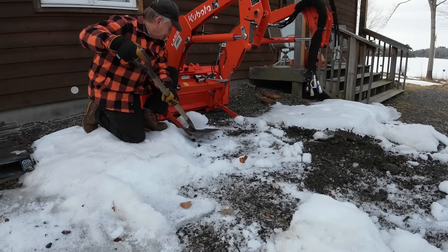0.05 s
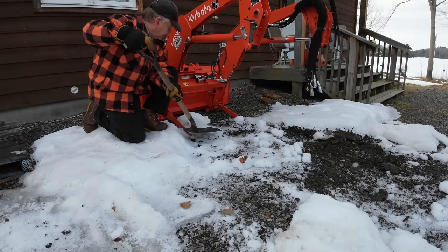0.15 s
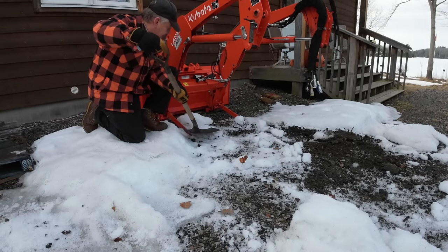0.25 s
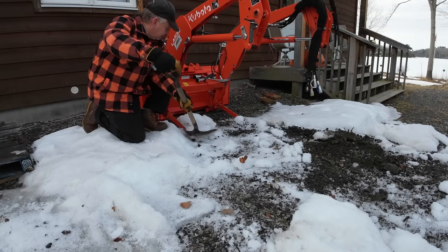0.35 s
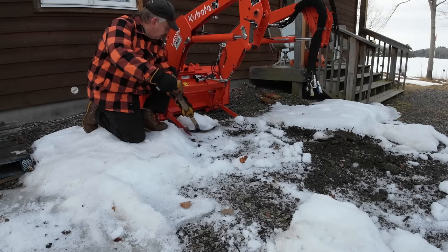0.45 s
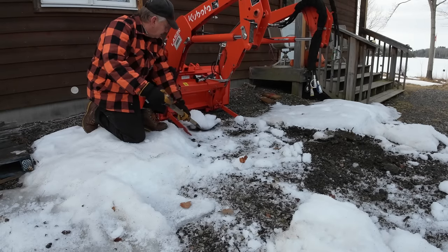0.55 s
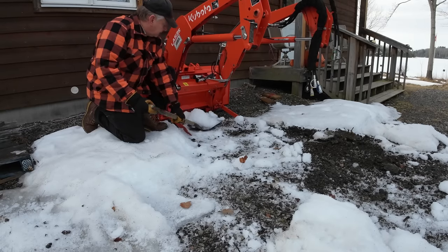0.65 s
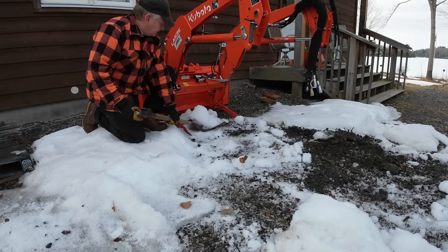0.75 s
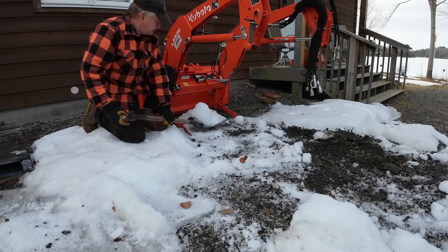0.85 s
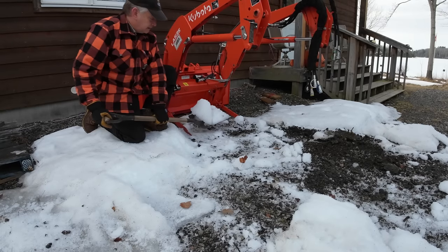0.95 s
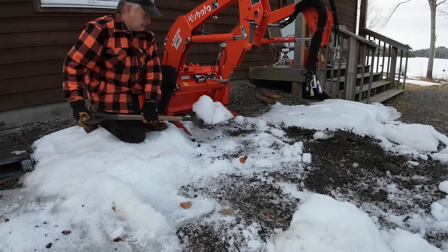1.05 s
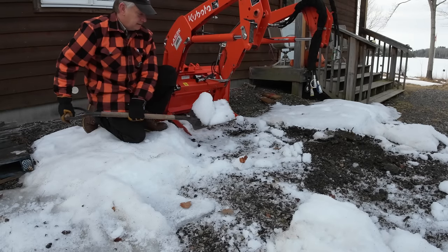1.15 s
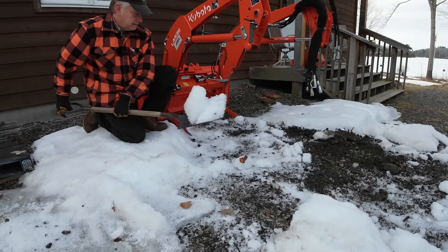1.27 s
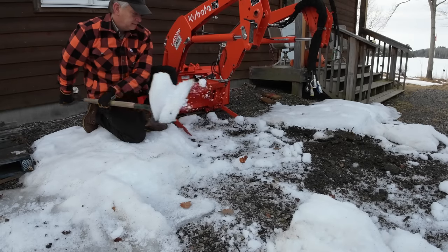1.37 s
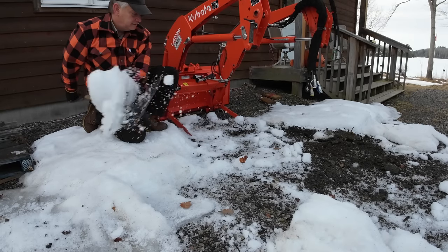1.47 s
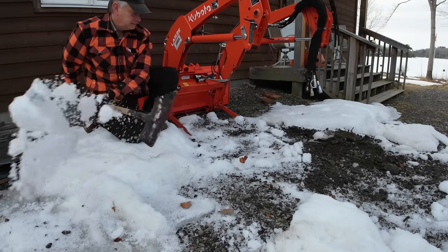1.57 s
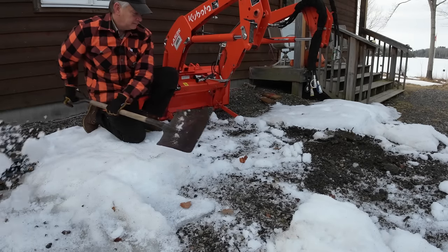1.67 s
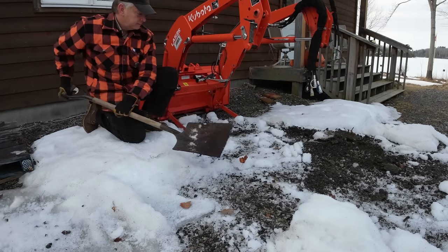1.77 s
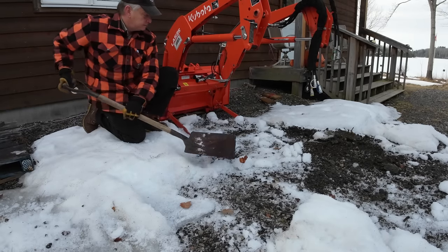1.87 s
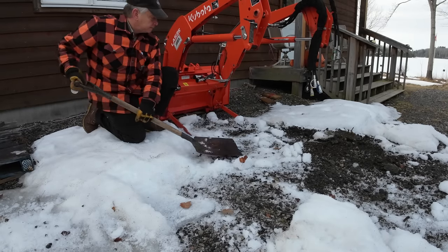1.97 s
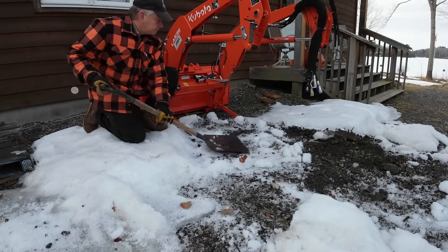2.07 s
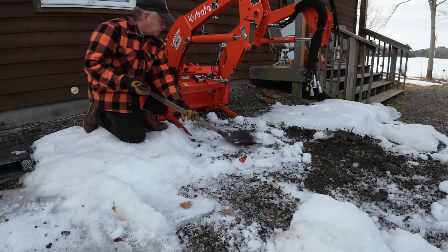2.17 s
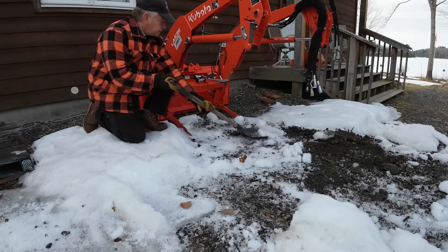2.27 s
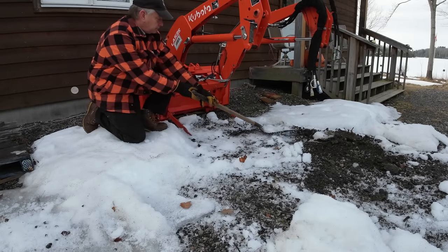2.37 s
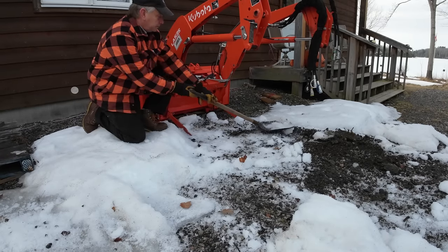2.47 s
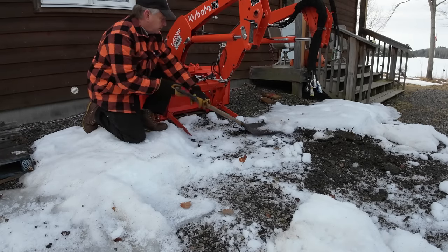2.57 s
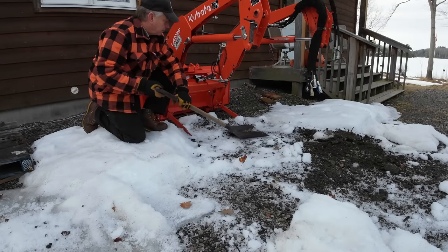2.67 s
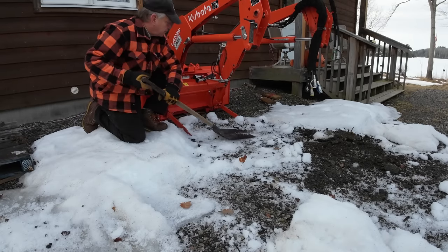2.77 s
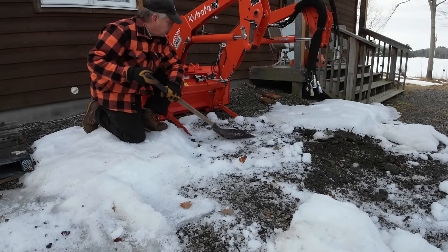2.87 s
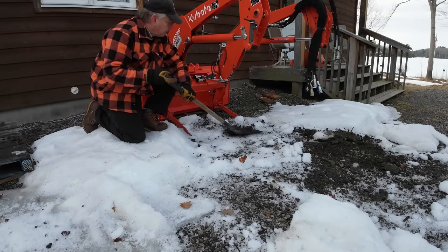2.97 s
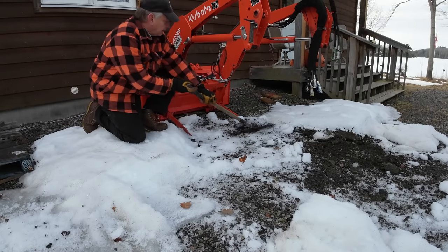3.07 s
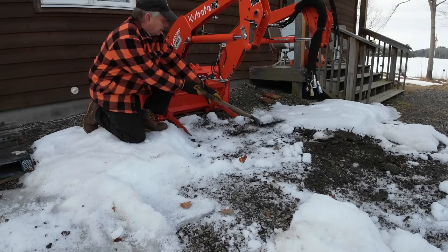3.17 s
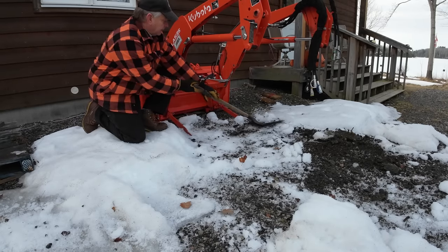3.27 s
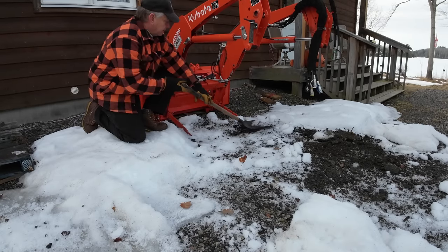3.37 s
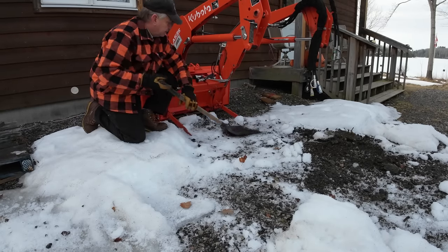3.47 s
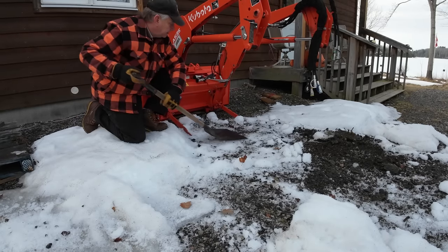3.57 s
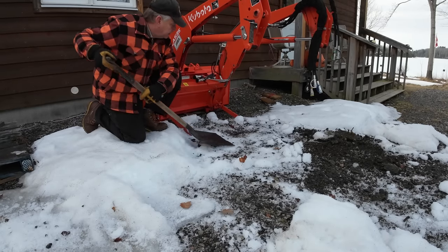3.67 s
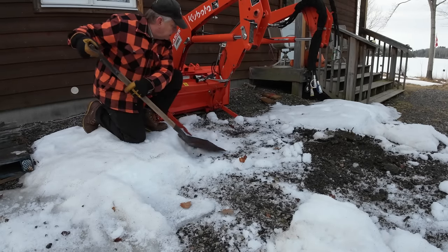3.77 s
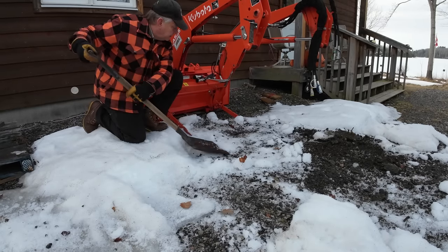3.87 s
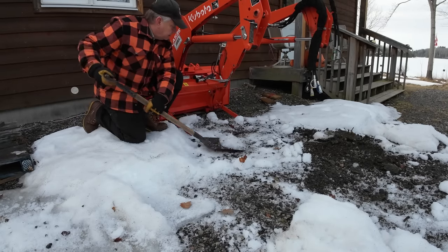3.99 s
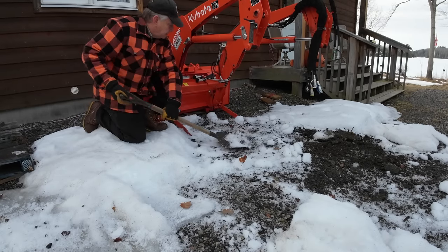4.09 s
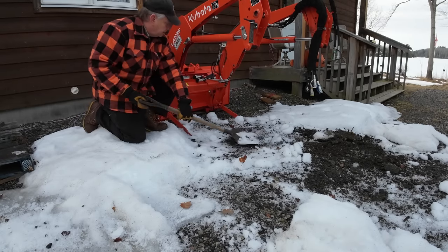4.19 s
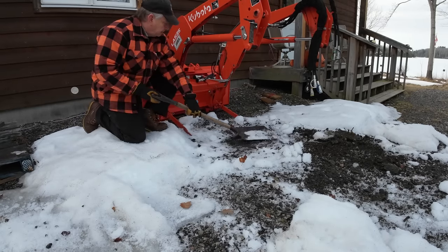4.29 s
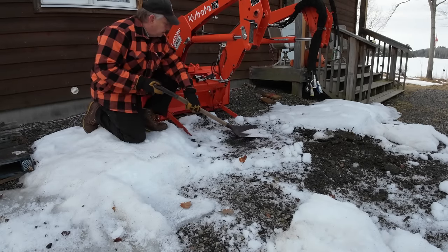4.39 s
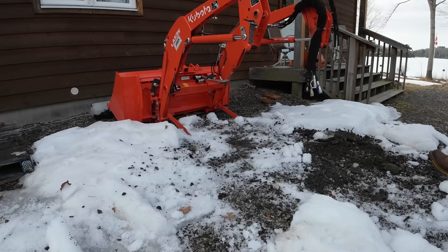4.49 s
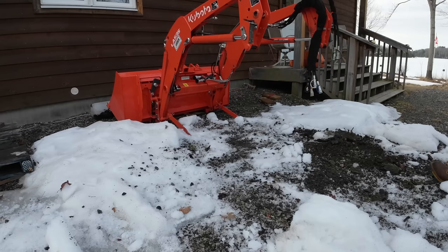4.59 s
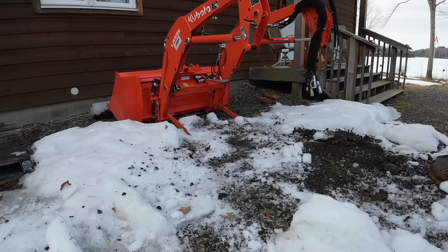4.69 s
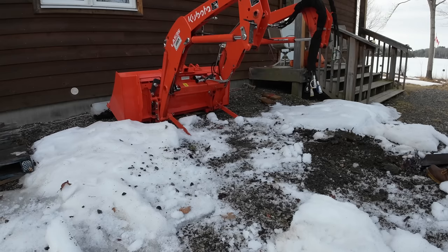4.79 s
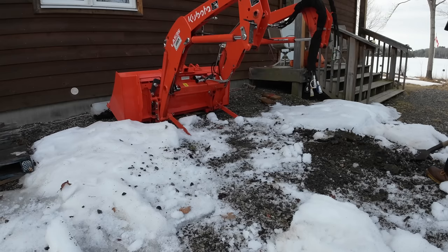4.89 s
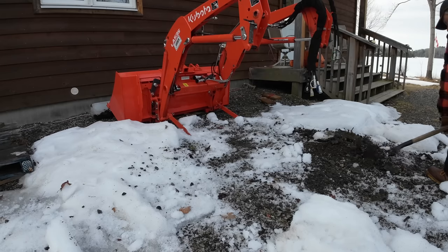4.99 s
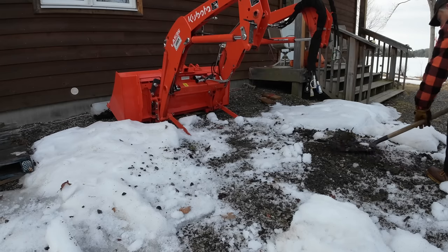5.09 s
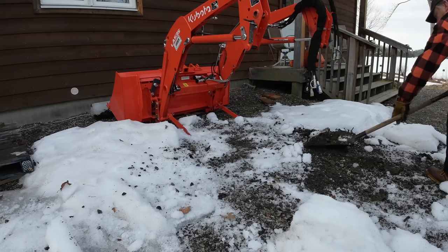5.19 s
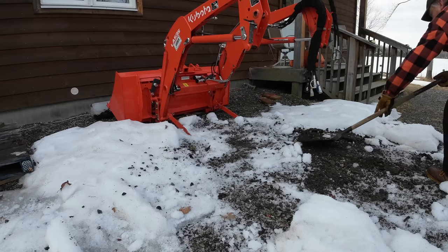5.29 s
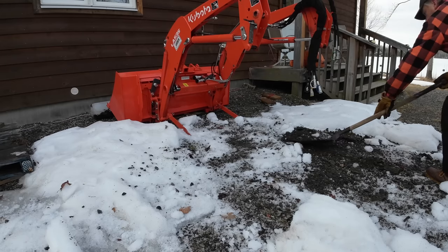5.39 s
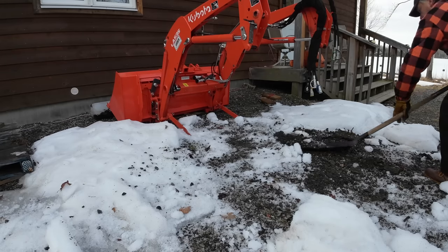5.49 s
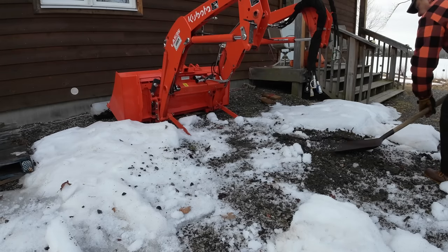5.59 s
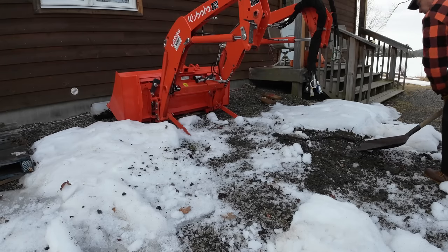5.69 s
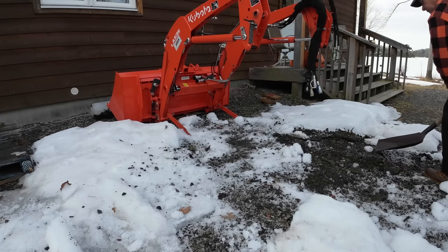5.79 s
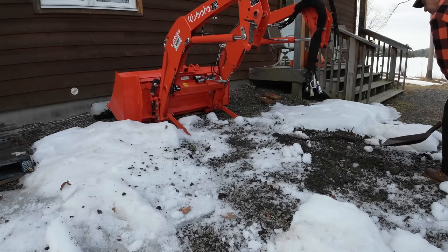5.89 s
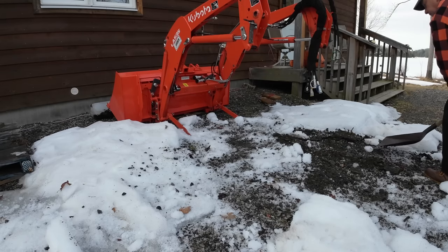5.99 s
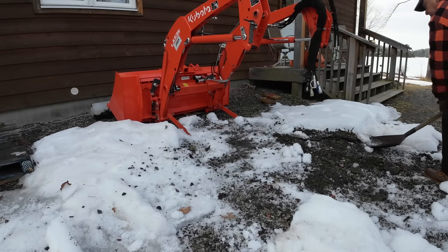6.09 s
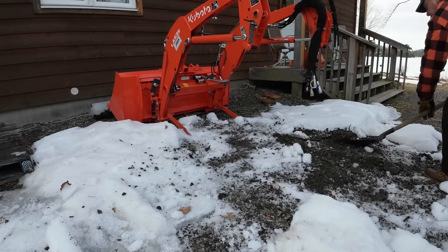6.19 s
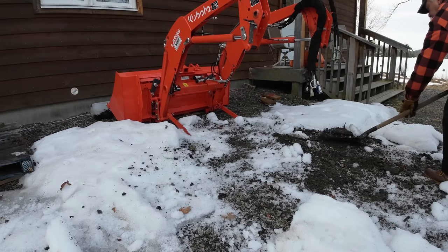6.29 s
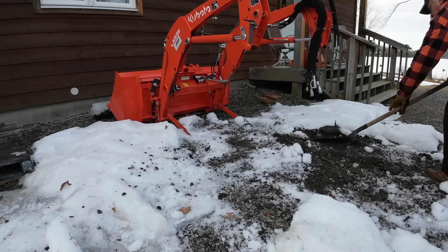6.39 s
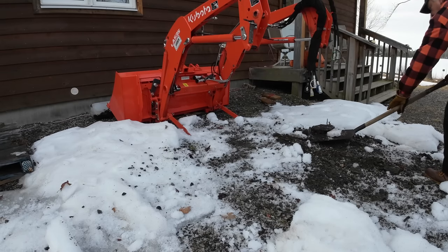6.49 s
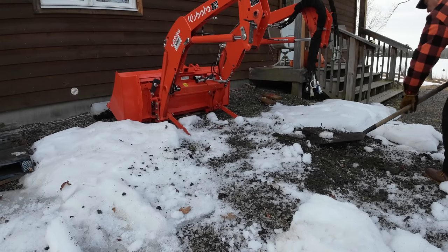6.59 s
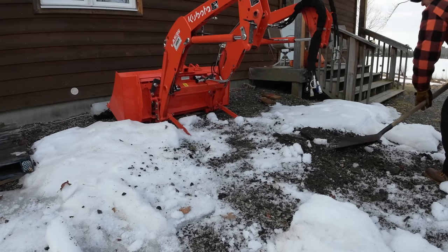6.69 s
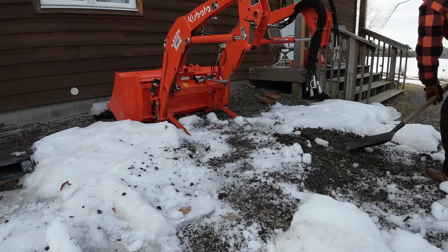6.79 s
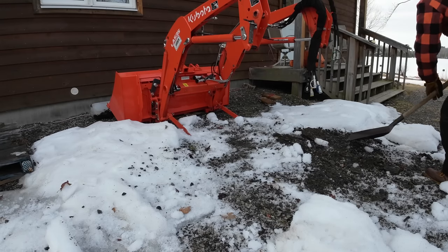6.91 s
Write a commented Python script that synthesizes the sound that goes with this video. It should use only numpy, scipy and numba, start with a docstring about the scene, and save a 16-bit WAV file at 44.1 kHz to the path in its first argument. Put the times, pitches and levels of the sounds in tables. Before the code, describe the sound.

Close outdoor shovelling on frozen gravel: a gritty scrape, a pause, then a dull snow thump with fine grains showering down. A run of uneven, grating strokes follows, the blade clanking and ringing briefly when lifted, ice chips cracking. It pauses, then sharp, bright scrapes return, separated by short quiet gaps. The small microphone gives little bass; a wooden wall adds faint short echoes over a quiet yard hum.

```python
"""Shovel on an icy gravel yard

A steel shovel scrapes icy snow off gravel beside a wooden wall. Dense grit clicks crunch at the edge and
shake the modes of the blade, which the ground damps and which ring on when it is lifted. Stones jolt the
edge, chips snap, thrown snow showers down as fine grains, and lumps land as short low thuds.
The wall returns three dull echoes, and the yard hums faintly as coloured noise."""
import sys
import numpy as np
from scipy import signal
from scipy.fft import rfft, irfft, next_fast_len
from scipy.io import wavfile
from numba import njit

SR = 44100
rng = np.random.default_rng(int(sys.argv[2]) if len(sys.argv) > 2 else 0)


def master(y):
    """Save y as 16-bit WAV."""
    cut = np.clip(np.atleast_2d(y).T, -1, 1)
    pcm = np.round(cut * 32767)  # scale
    wavfile.write(sys.argv[1], SR, pcm.astype(np.int16))


N = 306432   # samples
STEP = 32   # samples between points of the slow curves


def from_db(db):
    """Decibels to an amplitude factor."""
    return np.exp(np.asarray(db) * np.log(10) / 20)


def rms_one(x):
    """Scales a signal to rms 1."""
    return x / np.sqrt(np.mean(x ** 2) + 1e-20)


def every_sample(coarse):
    """Draws straight lines between the points of a slow curve."""
    return np.interp(np.arange(N) / STEP, np.arange(len(coarse)), coarse)


def drift(rate_hz):
    """Slow random wander with spread 1: noise through two equal low-pass poles."""
    pole = np.exp(-2 * np.pi * rate_hz * STEP / SR)
    noise = rng.standard_normal(N // STEP + 1002)
    slow = signal.lfilter([1], [1, -2 * pole, pole * pole], noise)[1000:]   # skip the filter's start
    return every_sample(rms_one(slow))


def coloured(x, spectrum):
    """Shapes a flat signal to a spectrum; rms 1."""
    size = next_fast_len(N)
    hz, db = np.transpose(spectrum)
    bins_hz = np.arange(size // 2 + 1) * SR / size
    gain = from_db(np.interp(np.log(bins_hz + 1), np.log(hz), db))
    return rms_one(irfft(rfft(x, size) * gain, size)[:N])


def brightened(x, bright_db, corner_hz):
    """Scales what lies above a corner."""
    low = signal.lfilter(*signal.butter(1, corner_hz, fs=SR), x)
    return low + from_db(bright_db) * (x - low)


def grit(per_s, spread_db, clump_db):
    """Random clicks of uneven size, coming in clumps; rms 1."""
    sizes = from_db(spread_db * np.minimum(rng.exponential(1, N), 5)) * rng.choice([-1, 1], N)
    born = rng.random(N) < per_s / SR
    return rms_one(sizes * born * from_db(clump_db * drift(53)))


def shortfall(rows):
    """How many dB each row lies under its full level through rise, hold and fall, as slow curves."""
    t = np.arange(0, N + STEP, STEP) / SR
    full, rise, hold, fall = np.transpose(rows)[:4, :, None]
    early = np.maximum(full - t, 0)
    late = np.maximum(t - full - hold, 0)
    return 20 * (early / np.maximum(rise, .002) + late / np.maximum(fall, .002))


def add_at(out, start_s, sound):
    """Mixes a short sound into a track, cut at the end of the track."""
    at = round(start_s * SR)
    out[at:at + len(sound)] += sound[:N - at]


# Hum of the yard. Each row: frequency in Hz, relative density in dB per Hz.
YARD = [(12, -37), (20, -8.5), (27, -18.5), (166, -5.5), (202, -18), (259, -15.5), (289, -16), (614, -20),
        (4000, -31.5), (15500, -45.5)]
YARD_DB = -61.5   # mean level, dB


def yard_hum():
    """Steady noise coloured like the open yard, its level wandering slowly by about 1 dB."""
    return from_db(YARD_DB + 1.0 * drift(3)) * coloured(rng.standard_normal(N), YARD)


# Reflections off the wooden wall. Each row: delay in seconds, level in dB.
WALL_ECHOES = [(.007, -24.5), (.013, -25.5), (0.023, -29.5)]


def wall_echoes(dry):
    """Late, quiet copies of the work, dulled because rough boards scatter the treble."""
    dull = signal.lfilter([.4], [1, -.6], dry)
    return sum(from_db(db) * np.pad(dull, (round(lag * SR), 0))[:N] for lag, db in WALL_ECHOES)


# Waves of thrown snow coming down. Each row: full from in seconds, rise in seconds per 20 dB,
# hold in seconds, fall in seconds per 20 dB, full level in dB.
SHOWER = [(1.721, 0.03, 0.073, 0.07, -42), (1.799, 0.01, 0.032, 0.04, -32), (1.869, 0.03, .02, 0.23, -40.5)]
# Colour of the falling grains. Each row: frequency in Hz, relative density in dB per Hz.
SHOWER_COLOUR = [(88, -43), (150, -13.5), (197, -3), (414, -3.5), (1530, -12), (7770, -4), (14200, -13.5),
                 (16000, -22)]


def shower():
    """Fine grains of snow patter on the crust: dense coloured clicks that swell in waves."""
    level = from_db(np.transpose(SHOWER)[4, :, None] - shortfall(SHOWER)).sum(0)
    patter = coloured(grit(9000, spread_db=2.5, clump_db=2.5), SHOWER_COLOUR)
    return every_sample(level) * patter


# Lumps of snow landing. Each row: start in seconds, relative strength in dB, pitch in Hz.
THUDS = [(0.673, -33, 420), (1.202, -23.5, 410), (1.815, -8, 418), (1.828, -16, 330), (2.356, -13.5, 319),
         (2.415, -18, 302), (3.774, -15, 581), (4.197, -20, 630), (4.591, -27, 213), (5.22, -29, 249),
         (5.262, -30, 300), (5.667, -22, 352), (5.698, -22, 353), (5.82, -25, 368), (6.14, -18, 555),
         (6.496, -26, 543)]


def thuds():
    """A soft lump: a brief low tone with a puff of noise, both kept dull by a low-pass."""
    out, t = np.zeros(N), np.arange(SR // 8) / SR
    shape = (1 - np.exp(-t / 0.0065)) * np.exp(-t / 0.0049)
    for start_s, strength_db, hz in THUDS:
        puff = rng.standard_normal(len(t)) * 0.46
        tone = np.sin(2 * np.pi * hz * t)
        add_at(out, start_s, from_db(strength_db) * shape * (puff + tone))
    return signal.sosfilt(signal.butter(2, 900, fs=SR, output="sos"), out)


# Single pebbles and ice chips snapping. Each row: start in seconds, relative strength in dB.
SNAPS = [(0.396, -12), (0.4414, -24), (0.455, -17), (0.828, -34), (1.2015, -31), (1.2714, -43),
         (1.313, -36), (1.3458, -38.5), (1.3736, -29), (1.3844, -25), (1.4032, -36), (1.571, -39),
         (1.7978, -14), (1.9245, -25.5), (2.4096, -14), (2.936, -10), (2.9646, -8), (3.331, -14),
         (3.418, -9), (3.935, -1), (4.089, -4), (4.3043, -33), (5.2455, -22), (5.474, -9.5), (5.526, -13),
         (5.8235, -39), (5.9285, -40), (5.9589, -41.5), (5.9994, -47), (6.0437, -25)]


def snaps():
    """Cracks a few ms long: mostly one-sided noise dying fast, through a band-pass."""
    out, t = np.zeros(N), np.arange(SR // 50) / SR
    for start_s, strength_db in SNAPS:
        crack = np.exp(-t / 0.0021) * rng.uniform(-0.1, 1, len(t))
        add_at(out, start_s, from_db(strength_db) * crack)
    return signal.sosfilt(signal.butter(1, [900, 6000], "band", fs=SR, output="sos"), out)


# Colour of the ground's rumble. Each row: frequency in Hz, relative density in dB per Hz.
RUMBLE = [(20, -31), (60, -17), (120, -11.5), (300, -2.5), (450, -5), (700, -5), (1400, -35)]


def ground_rumble(level_db):
    """The low part of the scrape: clumped clicks coloured low, following the strokes."""
    return from_db(level_db) * coloured(grit(4000, spread_db=2.0, clump_db=2.0), RUMBLE)


# The blade's modes. Each row: frequency in Hz, relative level in dB, T60 in seconds when held free.
BLADE = [(307, -6, .45), (624, 4, .35), (655, -1, .3), (727, -8, .6), (899, -9, .7), (1015, -3, .9),
         (1072, -2, .4), (1145, -5, .3), (1203, -2, 1.2), (1265, -5, .3), (1305, -7, .6), (1419, -12, 1.2),
         (1507, -2, .45), (1650, -7, .3), (1733, -6, .4), (1949, -8, .5), (2062, -3, .3), (2258, -9, .3),
         (2422, -11, .3), (2590, -9, .35), (2680, -10, .3), (2760, -11, .3), (2929, -13, .2),
         (3095, -12, .25), (3386, -13, .25), (3601, -12, .15), (3779, -14, .2), (3962, -15, .15),
         (4300, -14, .15)]
# Single knocks on the steel. Each row: start in seconds, relative strength in dB,
# frequency in Hz of the mode that the place of the blow favours.
CLANKS = [(1.982, -35, 624), (1.99, -26, 1507), (1.995, -29, 3601), (2.05, -22, 624), (2.395, -24, 624),
          (2.529, -36.5, 1072), (2.64, -34, 624), (2.746, -17, 1507), (2.795, -20, 624), (3.2, -41, 624),
          (3.235, -33, 1265), (3.345, -28, 1072), (3.426, -20.5, 1072), (3.44, -20, 2062), (3.5, -32, 624),
          (3.519, -18, 1507), (3.632, -13.5, 1265), (3.689, -19.5, 624), (3.78, -23.5, 624),
          (4.2, -21, 624), (5.476, -26.5, 1203), (5.53, -37, 1203), (5.555, -26, 1015), (5.57, -32, 1507),
          (5.578, -31, 2062), (6.501, -21, 1507), (6.577, -33, 1733), (6.601, -41, 1203),
          (6.651, -29, 2062), (6.655, -35.5, 1507)]
PRESSED_T60_S = 0.023   # ring time with the edge dug in


@njit
def ring(push, turn, keep):
    """One mode, a decaying rotation pushed along, whose loss per sample changes in time."""
    out, re, im, c, s = np.zeros(len(push)), 0., 0., np.cos(turn), np.sin(turn)
    for i in range(len(push)):
        re, im = keep[i] * (re * c - im * s) + push[i], keep[i] * (re * s + im * c)
        out[i] = im
    return out


def blade(push, free):
    """Pressure on the ground shortens every mode; each mode is shaken a little differently."""
    out = 0
    start_s, clank_db, favoured_hz = np.transpose(CLANKS)
    knock_at = np.round(start_s * SR).astype(int)
    for hz, level_db, free_t60 in BLADE:
        t60 = PRESSED_T60_S * (free_t60 / PRESSED_T60_S) ** free[::STEP]
        keep = np.repeat(from_db(-60 / SR / t60), STEP)
        uneven_db = 3 * drift(8)
        drive = push * from_db(level_db - 35 + uneven_db)
        favoured = np.exp(-(np.log(hz / favoured_hz) / 0.021) ** 2)
        stray = from_db(level_db - 25.0 + rng.normal(0, 4.3, len(start_s)))   # a knock stirs every mode
        drive[knock_at] += from_db(clank_db) * (favoured + stray)
        out = out + ring(drive, 2 * np.pi * hz / SR, keep)
    # take away the low skirts of the summed modes, so the steel rings without bass
    return signal.sosfilt(signal.butter(3, 400, "high", fs=SR, output="sos"), out)


# The edge catches a stone or crust. Each row: start in seconds, level in dB.
JOLTS = [(0.084, -42.5), (0.34, -22.5), (0.4414, -17), (1.312, -46), (1.3723, -47), (1.442, -45),
         (2.108, -27), (2.145, -23), (2.4097, -25.5), (2.578, -27), (2.7406, -22), (2.934, -17),
         (2.9652, -21), (3.328, -30), (3.4191, -20), (3.507, -18), (3.625, -18.5), (3.685, -22),
         (3.7763, -33), (3.8776, -31), (3.933, -18.5), (3.971, -20), (4.138, -21.5), (4.184, -24.5),
         (4.3013, -28.5), (4.5915, -45), (4.845, -19), (4.872, -16.5), (5.0974, -25.5), (5.22, -45),
         (5.244, -39), (5.4615, -39.5), (5.505, -32.5), (5.5268, -31), (5.776, -52), (5.823, -47),
         (6.0709, -19.5), (6.108, -16.5), (6.14, -13), (6.177, -21), (6.277, -28), (6.311, -19.5),
         (6.355, -26)]
JOLT_RISE_S, JOLT_T60_S = 0.0053, 0.077   # every jolt alike
JOLT_RING_DB = -4.5   # how hard a jolt's grit drives the blade, over the jolt's crunch
JOLT_BRIGHT_DB = 2   # a jolt is brighter than the stroke around it


def jolts():
    """Envelope of the bursts of grit: a quick rise, then a short decay."""
    out, t = np.zeros(N), np.arange(SR // 2) / SR
    rise = np.minimum(t / JOLT_RISE_S, 1)
    decay = from_db(-60 * np.maximum(t - JOLT_RISE_S, 0) / JOLT_T60_S)
    for start_s, level_db in JOLTS:
        add_at(out, start_s, from_db(level_db) * rise * decay)
    return out


def stones(lowest_hz, highest_hz, t60, count):
    """Grit clicks dealt to many small stones and upper sheet modes; higher ones die sooner."""
    clicks = grit(6000, spread_db=4.0, clump_db=1.0)
    dealt = rng.integers(0, count, N)
    detune = from_db(rng.normal(0, 0.14, count))
    out = 0
    for k, hz in enumerate(np.geomspace(lowest_hz, highest_hz, count) * detune):
        r = from_db(-60 / SR / t60 * np.sqrt(hz / lowest_hz))
        turn = 2 * np.pi * hz / SR
        gain = np.sqrt(hz * (1 - r))   # flat power per Hz over a log spacing
        own_clicks = clicks * (dealt == k) + 1e-18
        out = out + signal.lfilter([gain, 0, -gain], [1, -2 * r * np.cos(turn), r * r], own_clicks)
    return out


# Colour of the crunch. Each row: frequency in Hz, relative density in dB per Hz.
CRUNCH = [(150, -47), (300, -30.5), (600, -13), (1000, 1), (1600, 3.5), (2500, 0.5), (4000, -1.5),
          (6000, -3.5), (8300, -6.5), (10000, -14), (13000, -26), (16000, -25.5)]


def crunch(edge, crunch_db, bright_db, burst):
    """Bare grit clicks and ringing stones share one colour; strokes and jolts set level and treble."""
    ringing = rms_one(stones(900.2, 14000, t60=0.12, count=90))
    grain = coloured(edge + from_db(-4.0) * ringing, CRUNCH)
    scrape = from_db(crunch_db) * brightened(grain, bright_db, corner_hz=4500)
    jolt = burst * brightened(grain, bright_db + JOLT_BRIGHT_DB, corner_hz=4500)
    return scrape + jolt


# Strokes of the edge, and the rustle of settling snow between them. Each row: full from in seconds,
# rise in seconds per 20 dB, hold in seconds, fall in seconds per 20 dB, full crunch level in dB,
# brightness at full level in dB, ground rumble over crunch in dB, drive of the blade over crunch in dB
# before a lift weakens it, freedom of the blade from 0 (dug in) to 1 (in the air).
STROKES = [ (0.0, .1, 0.081, 0, -43, 1, -3.5, 5.5, .3), (0.122, -0.5, .1, 0.11, -49.5, -10, -4, 4, .3),
           (0.31, 0.12, .01, .1, -35, -4, -0.5, -5, .1),
           (0.369, .06, .14, .08, -16, -11, -18.5, -11, 0.088), (0.6, 2, 0.052, 0.2, -47.5, -7, 0, -2, .1),
           (0.765, .2, 0.41, .3, -62, -2.5, 3, -8, .15), (1.196, 0.14, 0.26, 0.17, -55, -3, -2, -8, .2),
           (1.985, 0.03, 0.013, 0, -27, 3, -19, 7, .85),
           (2.054, .02, 0.077, 0.11, -21.5, 0.5, -14.5, -2, 0.36),
           (2.15, 0.04, 0.054, 0.0145, -15.5, -3, -22.5, -9, .2),
           (2.288, 0.0728, 0.059, 0.0741, -16, -2.5, -19, -11.5, .2),
           (2.44, 0.5, .12, 0.1, -40, 2.5, -7.5, -8, 0.57),
           (2.581, .045, .15, .1, -29, -1, -17.5, -0.5, 0.73),
           (2.75, .01, .045, 0.05, -19, -6.5, -24, 4, 0.54),
           (2.893, 0.04, .05, 0.14, -28.5, -3.5, -5, 3, .2),
           (3.05, 0.142, 0.048, .11, -11, -4.5, -19, -11, .2),
           (3.198, -0.05, .1, 0.12, -34.5, -3, -13, 5, 0.91),
           (3.345, .03, .015, 0.11, -24, -8, -13, -4.5, .7),
           (3.42, .04, .025, 0.07, -20, -7.5, -14.5, -5, 0.7),
           (3.494, 0.02, 0.028, 0.0861, -15, -4, -20, -6.5, 0.65),
           (3.557, .05, .15, .15, -25, -4, -17.5, 4, 0.64),
           (3.753, 0.3, .04, 0.11, -30, -5, -8.5, -7, 0.58),
           (3.901, 0.08, 0.032, .1, -25, -1.5, -9.5, -10, .3), (3.991, .1, .1, 0.06, -17, 1, -18, -5, .4),
           (4.132, 0, 0.072, .035, -24, -4.5, -19.5, -10, 0.35),
           (4.248, 0.4, 0.066, 0.07, -35, -6.5, -15.5, -9, 0.69),
           (4.4, 0.14, .09, .002, -27, -14, -20, -2, .35), (4.601, 0.16, .01, 0.3, -47.5, -9, 1.5, -3, .02),
           (4.742, 0, .03, 0.2064, -17, 8.5, -13, 1, .02),
           (4.802, .03, .19, 0.1041, -16, 2, -21, 4.5, 0.11),
           (5.031, 0, .1, 0.0838, -24, -0.5, -19, 7.5, .15), (5.26, 0.1, .03, .15, -36.5, -8, -6, -5, .2),
           (5.417, 0.11, .01, 0.06, -29.5, -7, -15, -4.5, .4),
           (5.521, .1, .04, 0.0569, -28, 8, -20, 7, 0.68), (5.576, 0, 0.235, 0, -48, -1.5, -1.5, 0, .92),
           (5.86, -0.5, .15, 0.5, -69, -3, -3, -0.5, 0.85),
           (6.044, 0.0057, .27, 0.08, -22.5, 3, -19.5, 4.5, .05),
           (6.397, 0.07, .05, .1, -38, 1.5, -9, 5.5, .3),
           (6.489, .03, 0.016, 0.0643, -26, 2.5, -10, 2.5, .5),
           (6.574, .02, .01, 0.07, -27.5, 1.5, -16.5, 4, 0.74),
           (6.651, .006, .01, 0.04, -35, 1.5, -13, -1, 0.94),
           (6.7, 0.5, .03, 0.13, -50.5, -6, -5, -0.5, 0.97)]
DULLING = 0.23   # dB of treble lost per dB that a stroke is short of full
FREE_LOSS_DB = 14   # a fully lifted blade is shaken this much less by the grit


def strokes():
    """The powers of the strokes add, and the loudest lends its colour; a slowing edge sounds duller."""
    short_db = shortfall(STROKES)
    level_db, bright_db, *colour = np.transpose(STROKES)[4:, :, None]
    power = from_db(2 * np.maximum(level_db - short_db, -200))   # doubled dB: amplitude squared
    total = power.sum(0)
    colour = [bright_db - DULLING * np.minimum(short_db, 30), *colour]
    curves = [10 * np.log10(total)] + [(power * c).sum(0) / total for c in colour]
    return [every_sample(c) for c in curves]


def scene():
    """One set of strokes drives crunch, steel and rumble; the wall answers all but the yard hum."""
    crunch_db, bright_db, rumble_db, ring_db, free = strokes()
    free = np.clip(free, 0, 1)
    burst = jolts()
    edge = grit(12000, spread_db=2.5, clump_db=2.5)   # the same clicks crunch and shake the blade
    shake = from_db(crunch_db + ring_db - FREE_LOSS_DB * free) + from_db(JOLT_RING_DB) * burst
    dry = ground_rumble(crunch_db + rumble_db) + thuds() + snaps() + shower()
    dry = dry + blade(edge * shake, free) + crunch(edge, crunch_db, bright_db, burst)
    return (yard_hum() + wall_echoes(dry) + dry)[None]


def record(dry):
    """A small microphone rolls off the bass; peaks are rounded, the top is cut."""
    thin = signal.sosfilt(signal.butter(2, 45, "high", fs=SR, output="sos"), dry)
    rounded = .72 * np.tanh(thin / .72)
    # 80 dB down from 16200 Hz up
    return signal.sosfilt(signal.cheby2(16, 80, 16200, fs=SR, output="sos"), rounded)


dry = scene()
out = record(dry)
master(out)
```